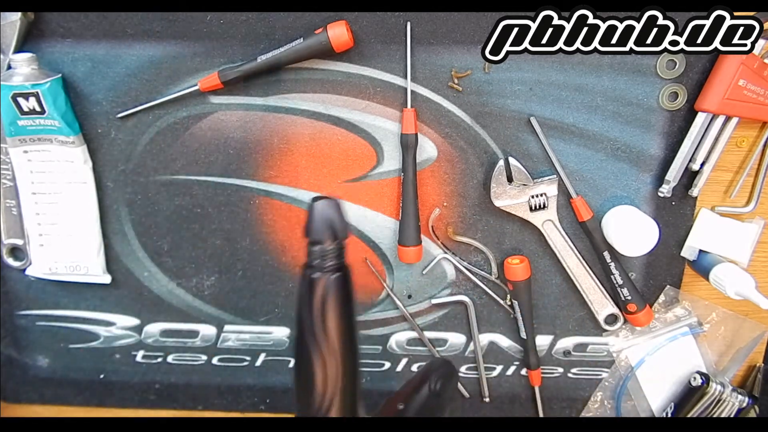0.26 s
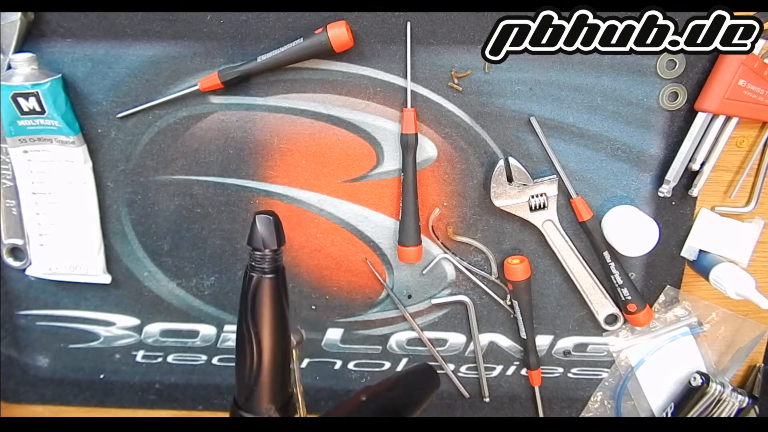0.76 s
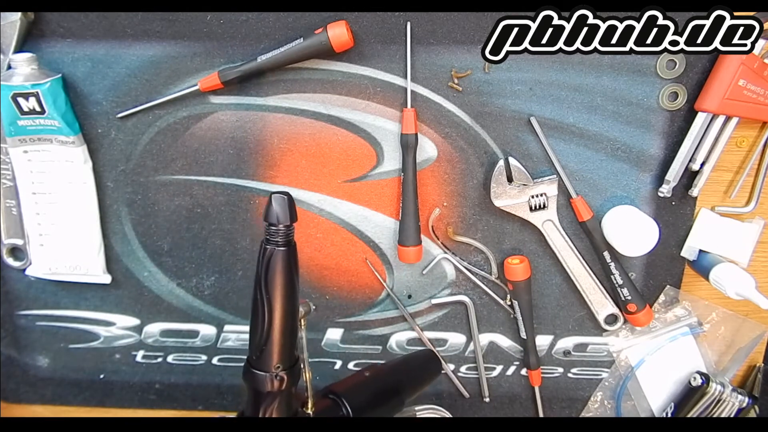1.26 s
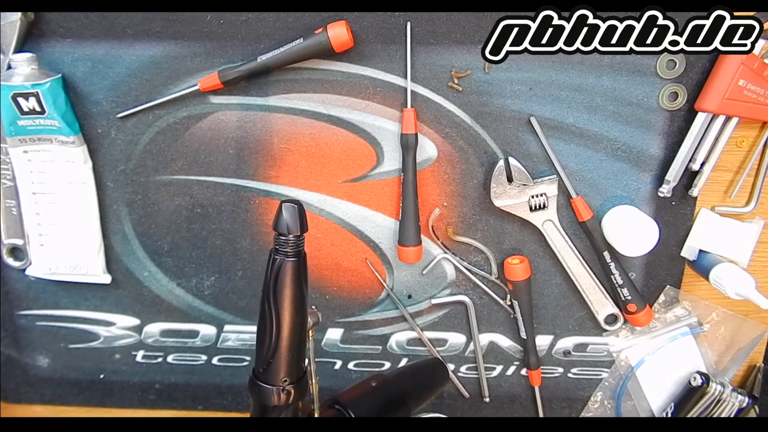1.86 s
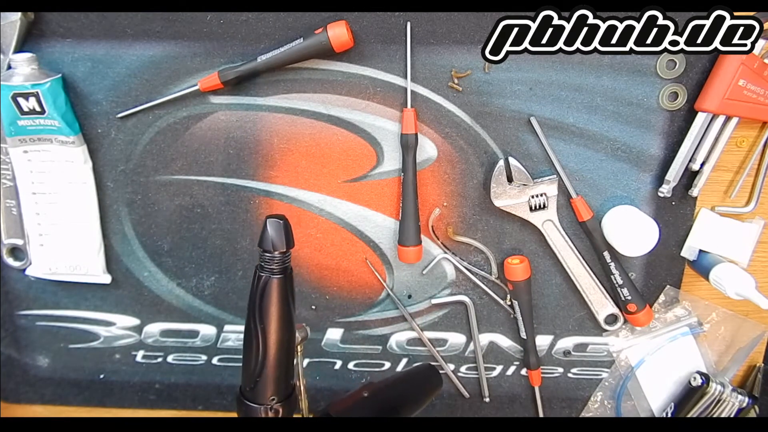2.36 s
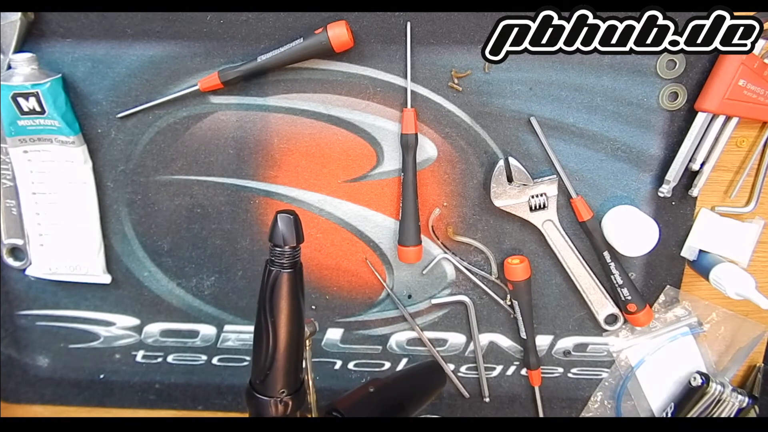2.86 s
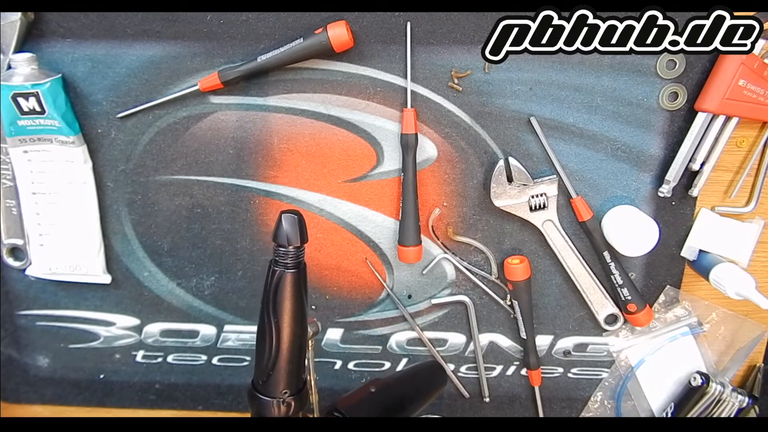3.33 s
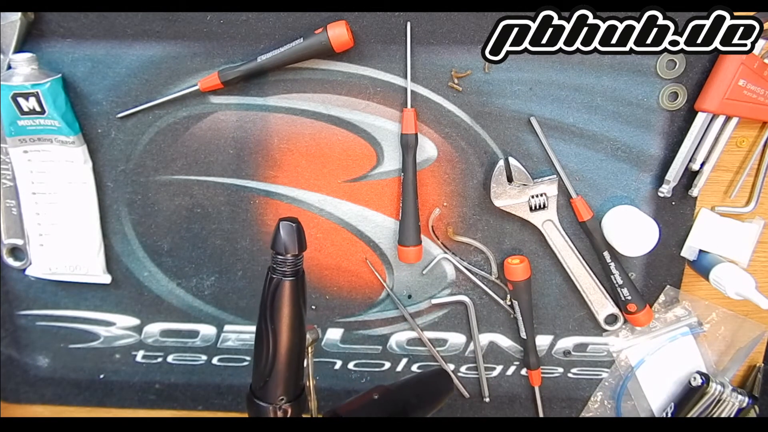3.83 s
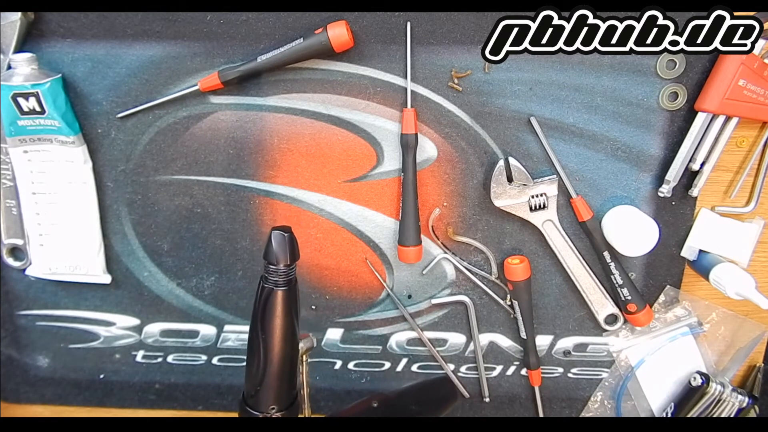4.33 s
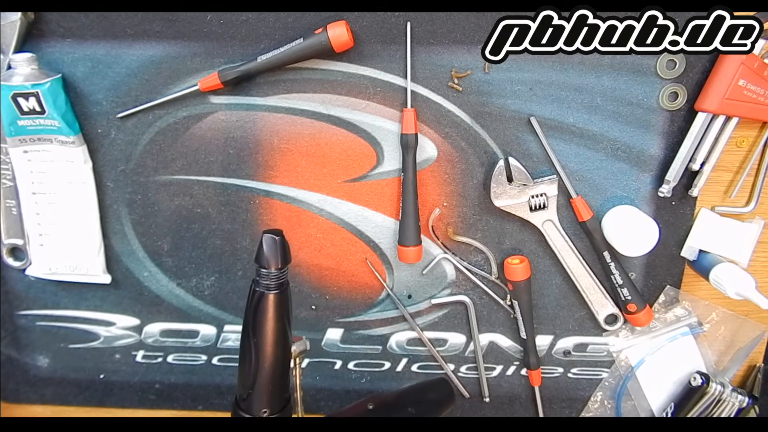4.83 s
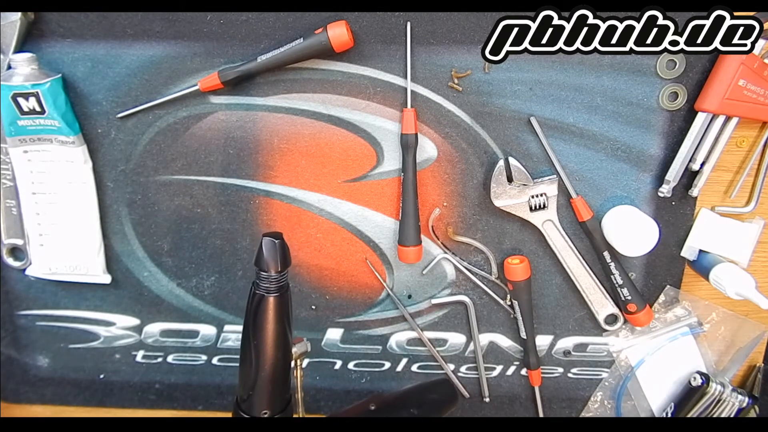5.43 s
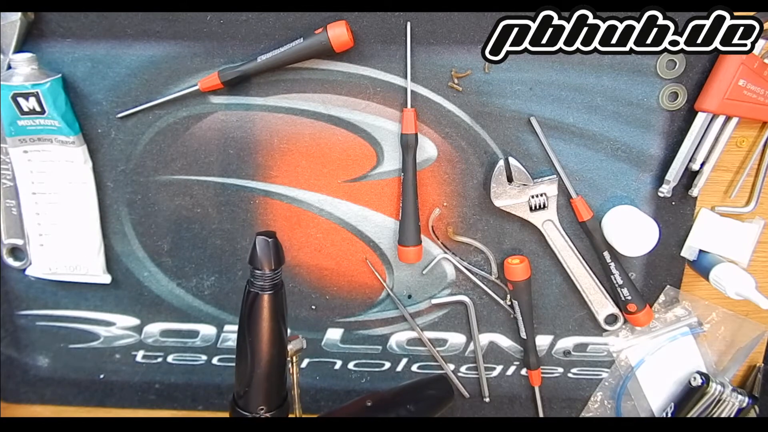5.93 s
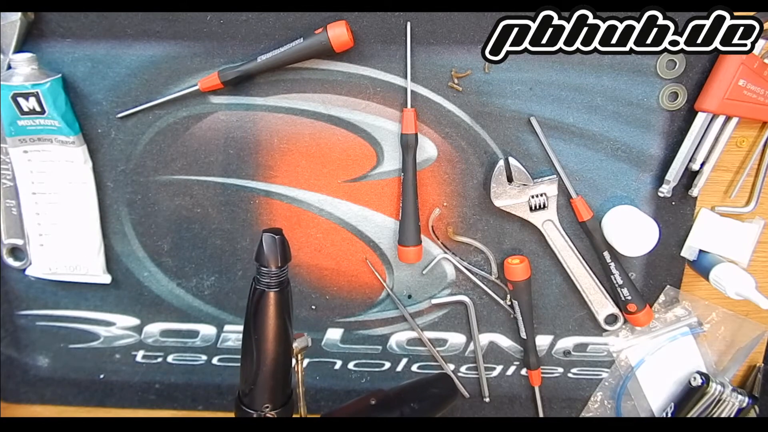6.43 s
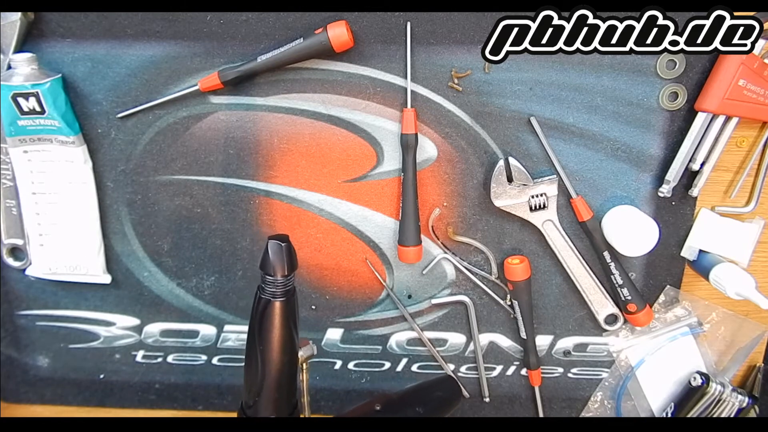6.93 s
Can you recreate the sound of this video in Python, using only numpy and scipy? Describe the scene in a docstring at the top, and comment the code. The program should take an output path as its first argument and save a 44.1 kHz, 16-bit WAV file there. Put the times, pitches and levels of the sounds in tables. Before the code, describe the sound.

A bright air leak swells close by, metallic double clacks begin and quicken, the leak seals, clacking continues dry, then one roaring shot bursts out.

```python
"""In a small room, a paintball marker held over a workbench leaks air from a seal until dry cycling seats it.
The leak is shaped noise in ranges that change as the marker turns, over a faint seep and low rumble.
Each cycle: the solenoid ticks, the bolt pumps two puffs of air down the barrel, and metal parts clack.
Puffs are smooth pressure lobes; metal is decaying modes and short noise rattles.
The last cycle fires a roaring blast of noise that overloads the mono microphone."""
import sys
import numpy as np
from scipy import signal
from scipy.fft import rfft, irfft, next_fast_len
from scipy.io import wavfile
from scipy.ndimage import uniform_filter1d

SR = 44100
rng = np.random.default_rng(int(sys.argv[2]) if len(sys.argv) > 2 else 0)


def wav_record(signal):
    """Record a signal, one row per channel, as 16-bit PCM in the file named by sys.argv[1]."""
    frames = np.transpose(np.atleast_2d(signal))
    bounded = np.clip(frames, -1, 1)
    # unit amplitude maps onto the largest positive 16-bit level
    quanta = np.round(bounded * 32767).astype(np.int16)
    wavfile.write(sys.argv[1], SR, quanta)


N = 316638

# cavities around the seal that the air sings in: pitch_hz, width_hz, boost_db
SEAL_CAVITIES = [(1454, 120, 13), (2321, 40, 12), (3700, 910, 3), (5550, 490, 6), (8500, 150, 7.5),
                 (11400, 500, 7), (13900, 900, 3)]
# bolt cycles: start_s, front_stop_strike_db, rear_stop_strike_db
BOLT_CYCLES = [(0.9844, -36, -42), (1.1966, -36, -42), (1.3609, -27, -42), (1.547, -22, -42),
               (1.7367, -21.5, -42), (1.9215, -22, -39), (2.1733, -30, -42), (2.25, -34, -52),
               (2.3263, -27, -27.5), (2.4243, -19, -40), (2.5008, -30, -31), (2.5826, -31.5, -31),
               (2.7688, -28, -31), (2.8452, -25.5, -35), (2.9335, -23.5, -30), (3.0947, -31, -29.5),
               (3.2754, -29, -28), (3.461, -30, -30), (3.645, -24, -26), (3.7215, -22, -38),
               (3.8206, -21, -41), (4.0253, -21.5, -37), (4.1935, -21.5, -35.5), (4.7308, -31, -38),
               (4.9087, -26, -34), (5.1244, -27.5, -38), (5.3098, -26, -37), (5.6893, -22, -41),
               (5.7657, -22, -42), (5.857, -25, -44), (5.9335, -25, -37), (6.03, -25, -44),
               (6.1068, -23.5, -46), (6.5282, -25, -37), (6.7221, -23.5, -39), (7.0427, -24, -31)]
CYCLE_S = np.array(BOLT_CYCLES)[:, 0]
BLAST_S = 7.064
SCATTER_DB = 3  # spread of mode levels from blow to blow


def undb(db):
    """Turn decibels into an amplitude factor."""
    return 10 ** (np.asarray(db) / 20)


def unit(x):
    """Scale a signal to rms 1."""
    return x / np.sqrt(np.mean(x ** 2))


def fade(t, t60):
    """Exponential decay that falls 60 dB in t60 seconds."""
    return np.exp(-np.log(1000) * t / t60)


def curve(t, points):
    """Straight lines through (seconds, value) points."""
    return np.interp(t, *np.transpose(points))


def add(out, s, x):
    """Mix x in at time s."""
    i = int(s * SR)
    out[i:i + len(x)] += x[:N - i]


def walk(rate):
    """Slow random wander: levels held 1 / rate s and smoothed twice; spread near 0.3."""
    k = int(SR / rate)
    steps = np.repeat(rng.standard_normal(N // k + 1), k)
    return 0.39 * uniform_filter1d(uniform_filter1d(steps, k), k)[:N]


def coloured(points, peaks=(), lo_hz=0, hi_hz=SR):
    """Noise with a (Hz, dB) spectrum and (Hz, width, dB) peaks or dips, between two steep edges; rms 1."""
    n = next_fast_len(N)
    f = np.arange(1, n // 2 + 2) * SR / n
    point_hz, point_db = np.transpose(points)
    db = np.interp(np.log(f), np.log(point_hz), point_db)
    db = db + sum(d / (1 + (2 * (f - hz) / w) ** 2) for hz, w, d in peaks)
    edges = 1 / np.sqrt((1 + (lo_hz / f) ** 30) * (1 + (f / hi_hz) ** 30))
    return unit(irfft(rfft(rng.standard_normal(n)) * undb(db) * edges, n)[:N])


def ring(modes, length, scatter_db=0., rise=0.000063):
    """Decaying sines of a struck object; each blow shares its force a little differently among them."""
    t = np.arange(int(length * SR)) / SR
    chance = rng.standard_normal((len(modes), 2))
    out = np.zeros(len(t))
    for (hz, db, t60), (level, pitch) in zip(modes, chance):
        detune = 1 + .002 * scatter_db * pitch
        out += undb(db + scatter_db * level) * fade(t, t60) * np.sin(2 * np.pi * hz * detune * t)
    return out * (1 - np.exp(-(t / rise) ** 2))


def burst(hz, width, t60):
    """A short rattle: noise resonating about hz, with a fast swell and a decay."""
    t = np.arange(int(.03 * SR)) / SR
    b, a = signal.iirpeak(hz, hz / width, SR)
    shape = (1 - np.exp(-(t / 0.00015) ** 2)) * fade(t, t60)
    noise = signal.lfilter(b, a, signal.lfilter(b, a, rng.standard_normal(len(t))))
    return unit(noise) * shape / shape.max()


def clack(db, hz, t60=0.012, share=1.74):
    """Metal on metal: a rattle about hz and the ring of the frame."""
    # frame modes: pitch_hz, level_db, t60_s
    frame_modes = [(1750, -15, 0.021), (3000, -17, 0.015), (4510, -15, 0.013), (5540, -13, 0.028),
                   (7520, -18.5, 0.018), (9640, -23, 0.0088)]
    return undb(db) * (burst(hz, 2.28 * hz, t60) + share * ring(frame_modes, .03, scatter_db=SCATTER_DB))


def puff(suck_ms, push_ms):
    """Slope of an air flow that starts fast and dies slower: two lobes of equal area, then the bench bounce."""
    suck, push = np.hanning(int(suck_ms * SR / 1000)), np.hanning(int(push_ms * SR / 1000))
    x, k = np.zeros(600), int(0.91 * len(suck))  # the lobes overlap slightly
    x[:len(suck)] -= suck
    x[k:k + len(push)] += push * suck.sum() / push.sum()
    return x + undb(-12) * np.roll(x, int(.0029 * SR))


def room_echo(puffs, hits):
    """Diffuse room tail of puffs and metal, and one return of the metal from the nearest wall."""
    room_t60_s, treble_t60_s, room_db = 0.25, 0.16, -11.5
    wall_ms, wall_db = 7.6, -19.5
    u = np.arange(int(.35 * SR)) / SR
    # the bass is left to the bench; the treble dies first
    wash = signal.lfilter(*signal.butter(2, 320, "high", fs=SR), rng.standard_normal(len(u)))
    low = signal.lfilter(*signal.butter(1, 1600, fs=SR), wash)
    tail = low * fade(u, room_t60_s) + 0.57 * (wash - low) * fade(u, treble_t60_s)
    tail = tail * (1 - np.exp(-(u / 0.0028) ** 2))  # the walls build up over a few milliseconds
    tail = undb(room_db) * tail / np.sqrt(np.sum(tail ** 2))
    late_hits = np.roll(hits, int(wall_ms * SR / 1000))
    wall = undb(wall_db) * signal.lfilter(*signal.butter(1, 7000, fs=SR), late_hits)
    return wall + signal.fftconvolve(puffs + undb(-0.5) * hits, tail)[:N]


def bench_ring(puffs):
    """The puffs set the low modes of the workbench ringing."""
    # bench modes: pitch_hz, level_db, t60_s
    bench_modes = [(158, -29, .15), (219, -30, .22), (286, -21, .24), (362, -33, .16), (452, -36, .14),
                   (532, -35, .14), (593, -30, .17), (680, -40, .12), (975, -41, .1), (1300, -37, .1)]
    return undb(-34) * signal.fftconvolve(puffs, ring(bench_modes, .35, 0., 0.012))[:N]


def room_rumble(t):
    """Low noise that swells and sinks under everything."""
    # rumble level: time_s, level_db
    rumble_level = [(0, -53), (.3, -42), (.55, -39), (.75, -45), (1.0, -43), (7.18, -51.5)]
    spectrum = [(10, 14.5), (22, 28.5), (50, 18.5), (110, -7.5), (200, -23.0)]  # pitch_hz, level_db
    return undb(curve(t, rumble_level) + 1.8 * walk(2.7)) * coloured(spectrum)


def seep():
    """A faint, nearly steady escape of air that sings in the seal cavities."""
    # seep spectrum: pitch_hz, level_db
    seep_spectrum = [(88, -51), (150, -17.5), (1160, -27.5), (1490, -20.5), (2000, -17.5), (2330, -35),
                     (2950, -48), (3790, -26.5), (7350, -20), (8590, -13.5), (10000, -12.5), (11100, -13.5),
                     (15700, -8.5)]
    return undb(-44.5 + 0.4 * walk(5.17)) * coloured(seep_spectrum, SEAL_CAVITIES)


def seal(t):
    """Leak change in dB: strokes press the seal shut and it springs open, until one stroke seats it."""
    chatter_from_s, seated_s = 2.17, 2.42  # the first stroke after seated_s is the seating one
    press_s, shut_s, spring_s, open_s = 0.016, .037, 0.073, 0.063  # after the stroke begins
    open_db, shut_db, crept_db = -2, -9, -10
    # after the seating stroke: since_stroke_s, leak_change_db
    seating_curve = [(.016, -0.5), (.031, -13), (.176, -23), (.256, -28.5)]
    seating_stroke_s = CYCLE_S[CYCLE_S > seated_s][0]
    s = CYCLE_S[(CYCLE_S > chatter_from_s) & (CYCLE_S <= seating_stroke_s)]
    since = t - s[np.maximum(np.searchsorted(s, t) - 1, 0)]
    chatter = np.interp(since, (press_s, shut_s, spring_s, open_s), (open_db, shut_db, crept_db, open_db))
    before_seating = np.where(t > s[0] + press_s, chatter, 0)
    db = np.where(t > s[-1], curve(since, seating_curve), before_seating)
    return uniform_filter1d(db, int(.006 * SR))


def leak_jet(t):
    """Turbulent hiss in five ranges whose levels and colour change as the marker turns to face the mic."""
    # jet spectrum: pitch_hz, level_db
    jet_spectrum = [(88, -83), (150, -21.5), (405, -12), (881, -13), (1490, -4.5), (1680, -1), (2290, 0),
                    (2570, -9.5), (3000, -8), (4180, -10.5), (5600, -8.5), (7490, -4), (12700, 1.5),
                    (14000, 14.5), (15700, 16)]
    # cavities heard from the side: pitch_hz, width_hz, boost_db
    side_cavities = [(1390, 160, 12.5), (1850, 840, -10.5), (2445, 86, 10), (2730, 360, 11),
                     (4100, 950, 10), (5370, 490, 7), (7430, 470, 9), (8500, 350, 6.5), (9500, 450, 5),
                     (11000, 300, -3), (12600, 400, 3), (14000, 800, -1)]
    # the turn towards the microphone, slowing halfway: time_s, share_of_turn (0-1)
    turn_path = [(.41, 0.03), (.51, .48), (.62, 0.58), (.7, 0.63), (.81, .94), (.95, 1)]
    # ranges of the jet: from_hz, to_hz, sideways_db, half_turned_db, facing_db
    jet_ranges = [(0, 2430, -48, -53, -41.5), (2676, 6450, -43, -47.5, -37),
                  (5900, 9600, -46.5, -48, -42.5), (9040, 13030, -39, -35, -36)]
    # level of the top treble: time_s, level_db
    treble_level = [(0, -39), (.4, -44), (.5, -40), (.7, -29), (.8, -30), (1.9, -28), (2.05, -31),
                    (2.17, -34.5), (2.26, -41)]
    treble_hz = 13200
    seal_db = seal(t) + 0.15 * walk(22)
    turn = np.clip(curve(t, turn_path), 0, 1)
    facing = np.clip(2 * turn - 1, 0, 1)
    ranges = [(lo, hi, np.interp(turn, (0, .5, 1), db)) for lo, hi, *db in jet_ranges]
    ranges.append((treble_hz, SR, curve(t, treble_level)))
    jet = np.zeros(N)
    for lo, hi, db in ranges:
        front = np.sqrt(facing) * coloured(jet_spectrum, SEAL_CAVITIES, lo, hi)
        side = np.sqrt(1 - facing) * coloured(jet_spectrum, side_cavities, lo, hi)
        jet += undb(db + seal_db + 2.1 * walk(20)) * (front + side)
    return jet


def handling_thuds(out):
    """Hands shift the marker: single low modes with a soft onset."""
    # thuds: start_s, level_db, pitch_hz
    thud_list = [(.345, -35, 30), (.436, -29, 45), (0.529, -31, 33), (.635, -37, 30), (.69, -48, 261),
                 (0.691, -46.5, 398)]
    for s, db, hz in thud_list:
        add(out, s, undb(db) * ring([(hz, 0, .14)], .2, 0., 0.006))


def switch_release(out):
    """The trigger switch springs back: a faint soft ring, then a sharp ring with a rattle."""
    # switch releases: start_s, level_db
    release_list = [(3.0474, -31), (3.22, -33), (3.4042, -35), (3.96, -39), (4.134, -45), (4.163, -46),
                    (4.29, -39.5), (4.793, -32.5), (4.9885, -27), (5.2065, -33), (5.3777, -31),
                    (5.913, -31), (6.8207, -30)]
    modes = [(1770, 0, .02)]  # pitch_hz, level_db, t60_s
    for s, db in release_list:
        add(out, s - .006, undb(db - 11.0) * ring(modes, .03, 0., 0.0015))
        add(out, s, undb(db) * (ring(modes, .03) + 0.53 * burst(3700, 4400, 0.0092)))


def loose_clacks(out):
    """Loose metal parts knock together and ring the frame."""
    # clacks: start_s, level_db, brightest_hz
    clack_list = [(0.531, -35, 11400), (2.1797, -15, 8700), (2.255, -14, 8950), (2.3379, -17.5, 7300),
                  (2.531, -28.5, 6500), (2.616, -31, 8600), (2.8025, -32, 7700), (2.8776, -25, 7550),
                  (2.9712, -31.5, 8200), (3.1113, -32, 8020), (3.1327, -29.5, 7230), (3.312, -26.5, 7400),
                  (3.498, -23, 6900), (3.6853, -24, 6600), (3.7632, -23, 7200), (3.8631, -22, 7450),
                  (4.0699, -28, 7400), (4.742, -26, 4150), (4.9197, -20, 6600), (5.1347, -25.5, 5330),
                  (5.318, -26, 5000), (5.7297, -26.5, 8800), (5.773, -26.5, 3600), (5.8068, -18.5, 6800),
                  (5.898, -18.5, 7200), (5.9411, -23.5, 5150), (5.9777, -19, 7000), (6.0374, -19.5, 4000),
                  (6.0739, -18.5, 7100), (6.1147, -24, 5150), (6.1529, -19.5, 6900), (6.5714, -12.5, 5060),
                  (6.5794, -33, 5700), (6.766, -9.5, 4970), (7.088, -9, 6200)]
    for s, db, hz in clack_list:
        add(out, s, clack(db, hz))


def bolt_metal(out, back_s):
    """Trigger and solenoid tick ahead of each puff; the bolt strikes its stops and settles."""
    # solenoid modes: pitch_hz, level_db, t60_s
    solenoid_modes = [(1800, -14, 0.04), (3565, -14, 0.025), (6810, 3.5, 0.0065), (7930, -1.5, 0.0071),
                      (9630, -2, 0.007), (12230, -1.5, 0.005), (14500, -12, .014)]
    # strikes after the stroke begins, and their brightest pitch
    front_ms, front_hz, rear_ms, rear_hz = 2.8, 7440, 21.6, 5660
    turning_ms, turning_db, turning_hz = 15.2, -36, 8500  # faint click as the bolt turns back
    slop_ms, tick_db = .7, -19.5  # spread of the strike times; solenoid level
    chance = rng.standard_normal((len(BOLT_CYCLES), 4))
    for (s, front_db, rear_db), back, (a, b, c, d) in zip(BOLT_CYCLES, back_s, chance):
        add(out, s - .0095, undb(-51.5) * burst(5500, 7000, 0.07))  # trigger
        tick = ring(solenoid_modes, .03, scatter_db=SCATTER_DB, rise=0.00096)
        add(out, s - .0057, undb(tick_db) * (tick + 0.37 * burst(9100, 15300, 0.027)))
        add(out, s + (front_ms + slop_ms * a) / 1000, clack(front_db, front_hz, 0.015, 1.1))
        turning = clack(turning_db + SCATTER_DB * d, turning_hz, 0.039, 0.34)
        add(out, s + (turning_ms + slop_ms * b) / 1000, turning)
        rear = clack(rear_db, rear_hz, 0.026, 0.34) + undb(rear_db - 1) * burst(1650, 330, 0.03)
        add(out, s + (rear_ms + slop_ms * c) / 1000, rear)
        add(out, back + 0.0038, undb(-31.5) * burst(1534, 770, 0.03))  # the bolt settles in its sleeve


def metal(back_s):
    """All the solid contacts: thuds, switch, loose parts and bolt."""
    out = np.zeros(N)
    handling_thuds(out)
    switch_release(out)
    loose_clacks(out)
    bolt_metal(out, back_s)
    return out


def returns():
    """Time and level of each return puff; the bolt waits longer as the seal seats and on a quick repeat."""
    wait_leaking_ms, wait_sealed_ms, wait_grows_s = 12.1, 13.3, (1.61, 3.48)
    repeat_s, repeat_ms = .08, .25  # a shorter gap than repeat_s adds repeat_ms
    # short strokes, by cycle number: wait_ms, return_puff_db
    short_strokes = {0: (8.3, -14)}
    wait_ms = np.interp(CYCLE_S, wait_grows_s, (wait_leaking_ms, wait_sealed_ms))
    wait_ms = wait_ms + repeat_ms * (np.diff(CYCLE_S, prepend=0) < repeat_s)
    db = -13 + .6 * rng.standard_normal(len(CYCLE_S))
    for k, (short_ms, short_db) in short_strokes.items():
        wait_ms[k], db[k] = short_ms, short_db
    return CYCLE_S + wait_ms / 1000, db


def air(back_s, back_db):
    """The bolt pumps air forward and back, pops slip past the seal, and a slug of air leads the blast."""
    # air let past the seal: start_s, level_db
    pop_list = [(2.1799, -22), (2.256, -14.5), (2.3378, -11.5)]
    out, lead_s, forward_db = np.zeros(N), .00065, -13.5
    for s, back, db in zip(CYCLE_S, back_s, back_db):
        add(out, s - lead_s, undb(forward_db) * puff(1.067, 1.414))
        add(out, back - lead_s, undb(db) * puff(1.185, 3.51))
    for s, db in pop_list:
        add(out, s, undb(db) * puff(1.25, 1.7))
    add(out, BLAST_S, undb(-1.0) * puff(1.96, 2.2))
    add(out, BLAST_S + 0.0038, undb(-8.0) * puff(1.9, 2.9))  # the column of gas swings back once
    return out


def blast(t):
    """Gas roars out of the barrel at full pressure and dies away, the treble first."""
    # blast spectrum: pitch_hz, level_db
    blast_spectrum = [(110, -14.5), (190, -3), (307, -10.5), (478, -12.5), (788, -16), (1300, -2),
                      (1420, -6.5), (2340, -9.5), (2520, -13), (3090, -14), (4900, -23), (5480, -8.5),
                      (6010, -20), (6470, -16), (15700, -21)]
    # barrel resonances and dips: pitch_hz, width_hz, boost_db
    barrel_peaks = [(1920, 230, -3.5), (6440, 350, 10), (9400, 630, 6), (11300, 400, 8), (11900, 400, 9),
                    (7700, 900, -8), (14100, 500, 9)]
    low_t60_s, high_t60_s = 0.2, 0.17
    after = np.maximum(t - BLAST_S, 0)
    low = fade(after, low_t60_s) * coloured(blast_spectrum, barrel_peaks, 0, 5100)
    high = undb(-1.5) * fade(after, high_t60_s) * coloured(blast_spectrum, barrel_peaks, 5000, SR)
    return undb(-7.5 + 1.6 * walk(240)) * (after > 0) * (low + high)


def scene():
    """Mix the leak, the cycling marker, its echoes and the blast, alike in both channels."""
    t = np.arange(N) / SR
    back_s, back_db = returns()
    puffs, hits = air(back_s, back_db), metal(back_s)
    leak = leak_jet(t) + seep() + room_rumble(t)
    echoes = room_echo(puffs, hits) + bench_ring(puffs)
    mono = leak + puffs + hits + echoes + blast(t)
    return np.array([mono, mono])


def record(dry):
    """The capsule drops the deep bass, the input clips near full scale and the top is cut."""
    top_hz = 15750
    dry = signal.lfilter(*signal.butter(2, 100, "high", fs=SR), dry)
    top_cut = signal.ellip(10, .2, 80, top_hz, fs=SR, output="sos")
    return signal.sosfilt(top_cut, np.clip(dry, -.9, .9))


dry = scene()
out = record(dry)
wav_record(out)
```